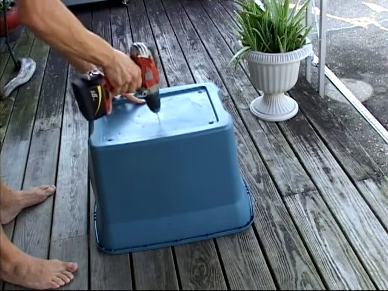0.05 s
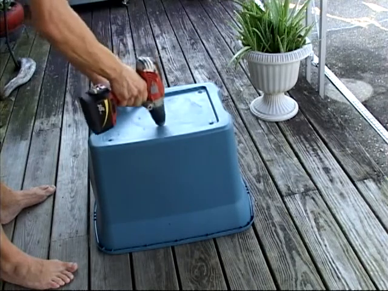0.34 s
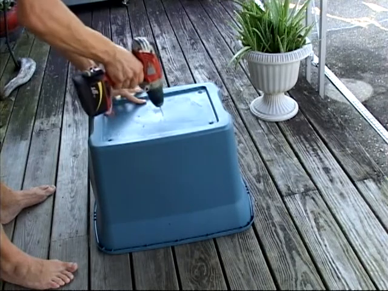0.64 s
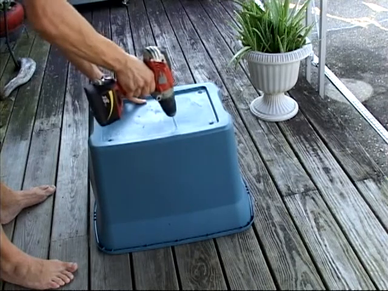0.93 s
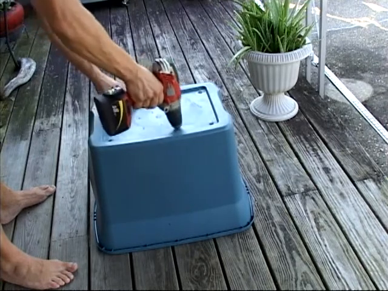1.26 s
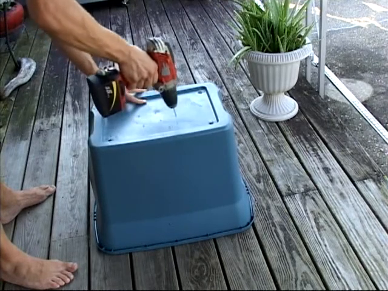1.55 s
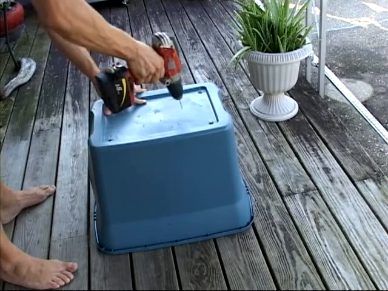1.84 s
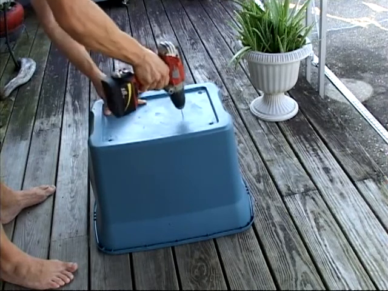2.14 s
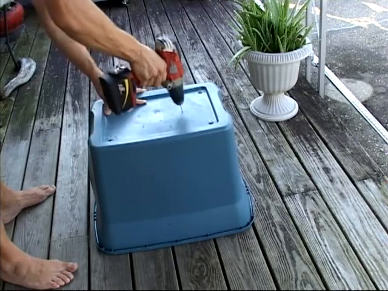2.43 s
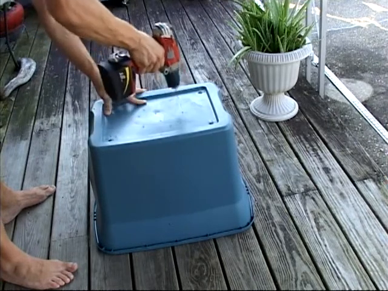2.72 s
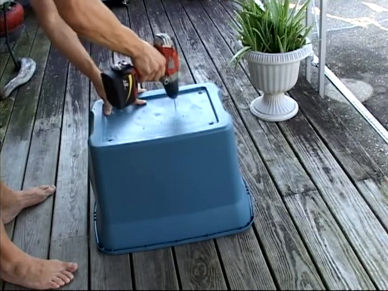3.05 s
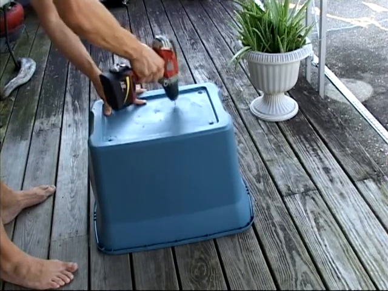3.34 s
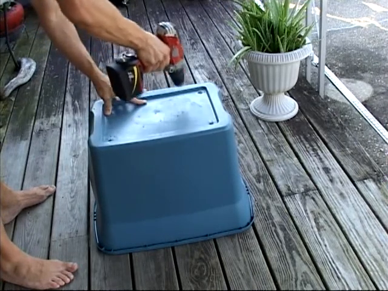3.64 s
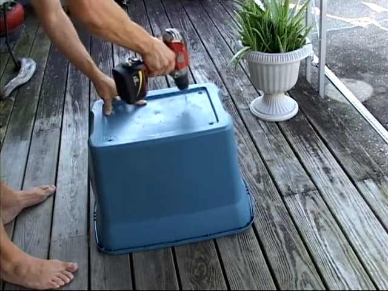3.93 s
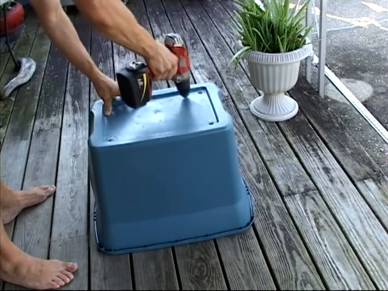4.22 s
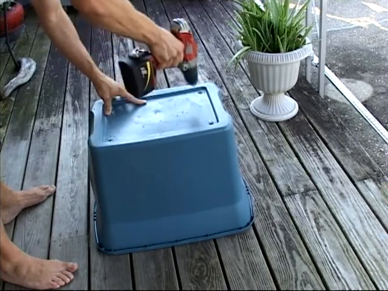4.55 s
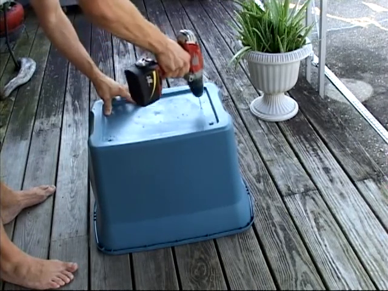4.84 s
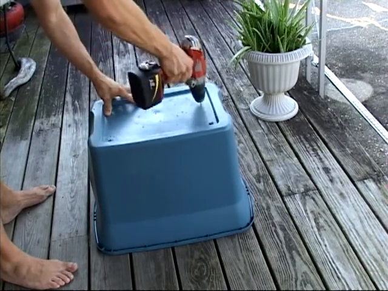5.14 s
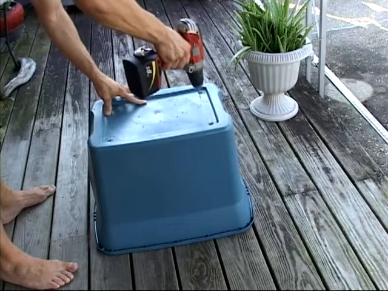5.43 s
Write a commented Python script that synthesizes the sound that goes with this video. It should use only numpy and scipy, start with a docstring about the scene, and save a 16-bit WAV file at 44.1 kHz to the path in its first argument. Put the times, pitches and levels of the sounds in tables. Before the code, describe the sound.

A cordless drill whines and rattles nonstop while boring six holes in a hollow plastic bin, with knocks and brief tearing snags.

```python
"""A cordless drill whines and rattles nonstop, boring six holes in an upturned plastic bin on a deck.
The whine is a set of multiples of the motor speed, which sags a little each time the bit bites.
Tooth impacts hiss in the gears and ring the housing. The bit knocks on the hollow bin, scrapes,
then snags and tears as it breaks through, shaking the wooden boards. Low outdoor air lies beneath."""
import sys
import numpy as np
from scipy import signal
from scipy.fft import rfft, irfft, next_fast_len
from scipy.io import wavfile
from scipy.ndimage import uniform_filter1d

SR = 44100
rng = np.random.default_rng(int(sys.argv[2]) if len(sys.argv) > 2 else 0)


def transcribe(signal):
    """Save signal, clipped to [-1, 1], as a 16-bit WAV file at the path in sys.argv[1]."""
    frames = np.atleast_2d(signal).T
    limited = np.clip(frames, -1, 1)
    pcm = np.round(limited * 32767).astype(np.int16)
    wavfile.write(sys.argv[1], SR, pcm)


N = 246078
TIME = np.arange(N) / SR
SIDES = np.array([[1], [-1]])  # left, right

# pushes on the drill: start/s, hardest/s, free again/s, speed lost/Hz
PUSHES = [(.29, .59, .86, 9.1), (1.23, 1.48, 1.79, 9.5), (2.19, 2.5, 2.8, 8.8), (3.11, 3.41, 3.74, 8.2),
          (4.06, 4.3, 4.62, 7.5), (5.02, 5.27, 5.58, 7.7)]
# holes: breakthrough/s, tear length/s, scrape/dB, tear/dB, deck shake re tear/dB, panel f/Hz, hum/dB
HOLES = [(.622, 0.094, -43, -37.5, -7, 155, -37), (1.573, 0.092, -42, -37.5, -6, 201, -38.5),
         (2.514, .13, -46, -41, -5, 199.5, -40.5), (3.462, 0.098, -44, -38, -3.5, 196, -35.5),
         (4.378, 0.092, -47, -41, -11, 160, -35), (5.301, 0.09, -43.5, -41, -6, 220.6, -31.5)]


def undb(db):
    """Decibels to gain."""
    return 10 ** (np.asarray(db) / 20)


def unit(x):
    """Scale to rms 1."""
    return x / np.sqrt(np.mean(x ** 2))


def curve(points):
    """(t/s, value) points to one value per sample."""
    return np.interp(TIME, *np.transpose(points))


def gate(start_s, end_s, rise_s, fade_s):
    """Linear rise, hold, exponential decay after the end."""
    return np.clip((TIME - start_s) / rise_s, 0, 1) * np.exp(-np.maximum(TIME - end_s, 0) / fade_s)


def walk(rate_hz):
    """Smooth random drift, rms 1."""
    hold = max(int(SR / rate_hz), 1)
    steps = np.repeat(rng.standard_normal(N // hold + 1), hold)[:N]
    return unit(uniform_filter1d(uniform_filter1d(steps, hold), hold))


def grains(rate_per_s, spread_db):
    """Random tiny impacts of uneven size, rms 1."""
    hit = rng.random(N) < rate_per_s / SR
    return unit(hit * rng.choice([-1, 1], N) * undb(spread_db * rng.standard_normal(N)))


def colour(x, points):
    """Filter by a spectrum of (f/Hz, level/dB) points."""
    size = next_fast_len(N + 8192)
    hz, db = np.transpose(points)
    grid_hz = np.maximum(np.fft.rfftfreq(size, 1 / SR), 1)
    gain = undb(np.interp(np.log(grid_hz), np.log(hz), db))
    return irfft(rfft(x, size) * gain, size)[:N]


def resonate(x, hz, width_hz):
    """One resonance, gain 1 at its centre."""
    return signal.lfilter(*signal.iirpeak(hz, hz / width_hz, fs=SR), x)


def spread(source):
    """Stereo from two draws of a source: one direct, one scattered from the sides."""
    # stereo width: f/Hz, side re mid/dB
    width = [(50, -10.5), (600, -19), (900, -15), (1350, -11.5), (1750, -4.5), (3300, -3), (4200, -6),
             (5900, -4), (7500, -8.5), (9700, -6.5), (11500, -11.5), (14000, -12)]
    return source() + SIDES * colour(source(), width)


def outdoors(air_db=-54):
    """Low, slowly swelling background."""
    # outdoor air spectrum: f/Hz, level/dB
    air = [(20, -10), (45, -10), (65, 1), (82, -15), (120, 3), (170, -9), (260, -18.5), (600, -8.5),
           (3000, -44)]
    return spread(lambda: unit(colour(rng.standard_normal(N), air))) * undb(air_db + 1.6 * walk(2.17))


def porch(x, t60_s=0.49, wet_db=-19, pan_db=-1.8, lag_s=0.000087):
    """The bin reaches one ear a moment later; deck and wall return a short, weak echo."""
    t = TIME[:SR // 2]
    echoes = rng.standard_normal((2, len(t))) * undb(-60 * t / t60_s)
    echoes /= np.sqrt(np.sum(echoes ** 2, axis=1, keepdims=True))
    direct = np.array([x, np.interp(TIME - lag_s, TIME, x)]) * undb(SIDES * pan_db / 2)
    return direct + undb(wet_db) * signal.fftconvolve(x[None], echoes, axes=1)[:, :N]


def early_echoes(x, count=12, echo_db=-8.5, wander_s=.00014):
    """Bin top, deck and wall reflect the drill; the delays drift as the hand moves."""
    share = undb(echo_db)
    echoes = 0
    for lag_s in rng.uniform(.003, .03, count):
        sent_s = TIME - lag_s - wander_s * walk(2)
        echoes = echoes + rng.choice([-1, 1]) * np.array([np.interp(sent_s, TIME, ear) for ear in x])
    return (x + share * echoes / np.sqrt(count)) / np.sqrt(1 + share ** 2)


def bin_ring(upper_db, split_hz=290):
    """The bin's response to one blow, peak 1; harder contact wakes more of the upper modes."""
    # bin modes: f/Hz, level/dB, t60/s
    modes = [(57.6, -11.5, 0.63), (91.5, -8, 0.78), (117.4, -14, 0.52), (151.4, 6.5, 0.28),
             (165.8, 3.5, 0.4), (199.4, 7, 0.27), (223.7, -2.5, 0.51), (264.8, -1, 0.3), (331, -21, 0.35),
             (357, -4, 0.27), (393, -11.5, 0.26), (446.3, 0.5, 0.12), (495.5, 0.5, 0.13), (572.4, -6, 0.24),
             (594, 2, 0.092), (690, -7.5, 0.13)]
    t = TIME[:SR // 2]
    ring = sum(undb(db + upper_db * (hz > split_hz) - 60 * t / t60_s) * np.sin(2 * np.pi * hz * t)
               for hz, db, t60_s in modes)
    return ring / np.abs(ring).max()


def strike_bin(blows, flex_s, ring_rise_s):
    """At each blow the soft panel swings for a few cycles and the whole bin rings on."""
    t = TIME[:SR // 2]
    swell = (t / flex_s * np.exp(1 - t / flex_s)) ** 2
    out = np.zeros(N + SR)
    for at_s, peak_db, spot_hz, ring_db, upper_db in blows:
        swing = swell * np.sin(2 * np.pi * spot_hz * t)
        ring = bin_ring(upper_db) * (1 - np.exp(-t / ring_rise_s))
        blow = swing + undb(ring_db) * ring / np.abs(ring).max()
        start = int(at_s * SR)
        out[start:start + len(t)] += undb(peak_db) * blow / np.abs(blow).max()
    return out[:N]


def knocks():
    """Bit and hand knock on the bin."""
    # knocks: t/s, peak/dB, struck spot f/Hz, ring re swing/dB, upper mode gain/dB
    blows = [(.157, -38, 163, 3, 7), (.237, -20.5, 142.5, -8, -2), (.388, -31, 146, -4, 4),
             (.615, -26, 188, -1, -5), (1.039, -38.5, 161, 15, 10), (1.222, -19, 141, 1.5, 1),
             (1.228, -25.5, 346.5, -11, 15), (1.245, -22.5, 131, -1, 12), (1.561, -25.5, 108, -1, 18),
             (2.102, -35, 137, 1, 9), (2.139, -37, 135, -8, -8), (2.165, -31.5, 138, -9, 5),
             (2.274, -32.5, 136, -2, 0), (3.064, -37.5, 275, 8, 7), (3.116, -31.5, 135, 5, -14),
             (3.221, -35.5, 155, -5, 7), (3.257, -38, 167, -9, -3), (3.962, -40.5, 154, 19, 5),
             (4.155, -36, 151, 12, -6), (4.861, -40, 226, 5, 9), (5.055, -32, 157, 5, -7),
             (5.103, -29.5, 132, 0, 8)]
    return strike_bin(blows, flex_s=0.01, ring_rise_s=0.0017)


def snags(gain_db=-2.0, ring_db=-9, upper_db=3):
    """The bit breaks through with one blow; its flutes then catch the rim in a quick, uneven run."""
    # catches on the rim: t/s, relative peak/dB, f/Hz
    catches = [(.629, -16.5, 157), (.657, -15.5, 183), (.684, -30, 230), (.711, -28.5, 212),
               (1.58, -17.5, 176), (1.606, -23.5, 193), (1.648, -24, 192), (2.514, -21, 180),
               (2.532, -23.5, 163), (2.552, -36, 290), (2.576, -21, 159), (2.604, -26, 152),
               (3.467, -17.5, 162), (3.483, -22, 207), (3.523, -23, 189), (3.56, -23, 187),
               (4.39, -27.5, 225), (4.415, -27, 155), (4.442, -25, 181), (4.461, -22, 170),
               (5.302, -24.5, 272), (5.324, -33, 235), (5.36, -26, 172), (5.383, -30, 170),
               (5.416, -35, 126)]
    blows = [(at_s, db + gain_db, hz, ring_db, upper_db) for at_s, db, hz in catches]
    return strike_bin(blows, flex_s=0.0076, ring_rise_s=0.0024)


def panel_hum(width_hz=16):
    """Tearing keeps the panel round each hole humming at its own pitch; it rings on briefly."""
    out = 0
    for through_s, length_s, *_, hz, hum_db in HOLES:
        chips = grains(1500, 2.7) * gate(through_s, through_s + length_s, 0.011, 0.0092)
        ring = resonate(resonate(chips, hz, width_hz), hz, 4 * width_hz)
        out = out + undb(hum_db) * ring * np.sqrt(length_s * SR / np.sum(ring ** 2))
    return out


def cutting(turns, gear_ratio=14, bite_delay_s=0.12, chatter=0.11, ring_db=-2, pressing_db=-12):
    """Two cutting edges shave the plastic, then tear through the last skin and shake the deck."""
    # spectrum of shaved and torn plastic: f/Hz, level/dB
    shaving = [(40, -42), (130, 0), (290, 1), (450, -3), (600, -0.5), (800, -1), (1500, -23), (3000, -27),
               (6000, -45), (12000, -75)]
    # spectrum of the deck boards: f/Hz, level/dB
    deck = [(15, -25), (32, -10), (60, 0), (80, 0), (100, -8), (220, -30), (1500, -90)]
    scrape, tear, shake = 0, 0, 0
    for (push_s, *_), (through_s, length_s, scrape_db, tear_db, deck_db, *_) in zip(PUSHES, HOLES):
        scrape = scrape + undb(scrape_db) * gate(push_s + bite_delay_s, through_s, 0.088, 0.024)
        tearing = undb(tear_db) * gate(through_s, through_s + length_s, 0.0054, 0.034)
        tear = tear + tearing
        shake = shake + undb(deck_db) * tearing
    edges = 1 + chatter * np.cos(2 * np.pi * 2 * turns / gear_ratio)

    def plastic(upper_db):
        """Chips snap off in waves as each edge passes; each rings the bin."""
        chips = grains(1500, 4.4) * edges
        ring = signal.fftconvolve(chips, bin_ring(upper_db))[:N]
        return unit(unit(colour(chips, shaving)) + undb(ring_db) * unit(ring))

    rumble = (undb(pressing_db) * scrape + shake) * unit(colour(grains(900, 0.9), deck))
    return scrape * plastic(upper_db=11) + tear * plastic(upper_db=4) + rumble


def gearbox(turns, load, throb=0.071, treble_hz=7000, pan_db=.5, fade_db_per_s=0.1432):
    """Dense tooth impacts, harder under load, hiss in the gears and ring the housing."""
    # gear rattle spectrum: f/Hz, level/dB
    spectrum = [(200, -30), (290, -19), (380, -19), (600, -14), (850, -5.5), (1500, -5), (1900, -3),
                (2300, -3.5), (3500, -2), (4200, 1), (5400, -0.2), (6300, -5), (7500, -7.5), (8400, -8),
                (9800, -15.5), (13800, -23), (15500, -62)]
    # housing resonances: f/Hz, width/Hz, level/dB
    modes = [(810, 20, -12.5), (923, 15, 3.5), (999, 57, -2.5), (1105, 25, -1.5), (1208, 50, 3),
             (1277, 48, -7), (1806, 25, 0), (1917, 9.7, -5.5), (3100, 30, -3.5), (3960, 76, -7.5),
             (4216, 91, -5), (6730, 150, -8)]
    flicker_db = 0.5 * walk(70) + 0.34 * walk(9)
    clatter = (1 + throb * np.cos(2 * np.pi * turns)) * undb(flicker_db)
    rattle = spread(lambda: unit(colour(grains(25000, 1.3) * clatter, spectrum)))
    body = signal.sosfiltfilt(signal.butter(2, treble_hz, fs=SR, output="sos"), rattle)
    treble_db = -0.8 - 0.45 * TIME + 0.5 * load  # dulls slowly, brightens under load
    rattle = body + (rattle - body) * undb(treble_db)

    def housing():
        """The shell rings under tooth impacts."""
        teeth = grains(8000, 2.1) * clatter
        return unit(sum(undb(db) * resonate(teeth, hz, width_hz) for hz, width_hz, db in modes))

    ring = spread(housing) * undb(-3 + load - 0.08 * TIME)
    gears = rattle * undb(3.5 + SIDES * pan_db / 2) + ring
    return gears * undb(-35.5 - fade_db_per_s * TIME + 0.5 * load)


def echo_paths(rate_hz):
    """Complex gain of a tone's many echoes at each ear, shifting as the drill moves."""
    return np.array([walk(rate_hz) + 1j * walk(rate_hz) for _ in range(2)]) / np.sqrt(2)


def cancellations():
    """Complex gain of the main tone cancelling against its echo: it dips and returns inverted."""
    # dropouts: t/s, half length/s, depth/dB
    dropouts = [(.45, .012, -8), (.532, .008, -20), (.605, .02, -16), (.688, .015, -22), (.757, .018, -13),
                (1.02, .03, -18), (1.36, .015, -9), (1.53, .02, -8), (1.595, .02, -22), (1.692, .025, -20),
                (2.27, .02, -15), (2.388, .025, -14), (3.018, .025, -20), (3.17, .01, -11),
                (3.225, .01, -17), (3.685, .01, -15), (3.753, .018, -20), (3.985, .012, -18),
                (4.205, .01, -9), (4.535, .012, -8), (4.72, .025, -11), (5.085, .025, -11),
                (5.24, .015, -18), (5.365, .025, -11)]
    gain = np.ones(N, complex)
    for at_s, half_s, depth_db in dropouts:
        crossing = np.sin(np.pi / 2 * np.clip((TIME - at_s) / (2 * half_s), -1, 1))
        residue = rng.choice([-1, 1]) * undb(depth_db) * (1 - crossing ** 2)
        gain = gain * (crossing + 1j * residue)
    return gain


def whine(turns, load, jitter_rad=.15, flutter_db=.9, ear_phase_rad=0.94, sway_db=0.5, echo_load_db=2):
    """Motor harmonics: the 15th and 16th beam as the drill moves and beat with echoes; the rest flicker."""
    # main tone, 15th: t/s, level/dB
    main_levels = [(0, -33.5), (.09, -36.5), (.2, -30), (.31, -25.5), (.37, -39), (.42, -38), (.48, -30.5),
                   (.56, -33), (.65, -32), (.73, -34), (.81, -31), (.89, -31.5), (.97, -42), (1.16, -43),
                   (1.2, -35), (1.28, -29), (1.47, -29), (1.63, -30.5), (1.78, -36), (1.86, -31),
                   (1.96, -29), (2.1, -32), (2.14, -39), (2.29, -40), (2.32, -31), (2.42, -33), (2.48, -27),
                   (2.52, -28.5), (2.55, -39), (2.62, -33.5), (2.73, -39), (2.78, -35), (2.83, -38),
                   (2.87, -31.5), (2.98, -35), (3.06, -30), (3.13, -29), (3.28, -36), (3.34, -30),
                   (3.38, -35), (3.43, -31), (3.48, -38), (3.55, -38), (3.6, -27), (3.67, -37), (3.95, -37),
                   (4.03, -39), (4.11, -48), (4.18, -27), (4.24, -35), (4.29, -33.5), (4.35, -43),
                   (4.41, -30.5), (4.5, -31.5), (4.65, -39), (4.78, -34), (4.86, -33), (4.94, -29),
                   (5.15, -30), (5.2, -38), (5.26, -36), (5.3, -27.5), (5.43, -28), (5.48, -39),
                   (5.57, -36)]
    # side it beams to: t/s, left re right/dB
    main_pan = [(0, 6), (.3, 2.5), (.42, -3), (.5, 2), (.76, -8), (.88, 7), (1.3, -1), (1.52, 2),
                (1.72, -4), (2.1, 9.5), (2.26, 1), (2.55, 1), (2.68, -3), (3.0, 3), (3.18, -8), (3.39, 6),
                (3.65, -5), (3.95, 2), (4.35, -6), (4.55, 6), (4.8, -10), (4.93, 6), (5.2, 0), (5.57, 3)]
    # upper tone, 16th, with its own beam: t/s, relative level/dB
    upper_levels = [(0, -45), (.1, -52), (.16, -43), (.29, -37), (.42, -41), (.6, -42), (.82, -41),
                    (.93, -48), (1.05, -42), (1.29, -39), (1.53, -44), (1.8, -41), (1.93, -41), (1.99, -51),
                    (2.2, -46), (2.36, -39.5), (2.51, -38), (2.55, -48), (2.6, -40.5), (2.89, -47),
                    (2.96, -41), (3.06, -38), (3.27, -44), (3.42, -42), (3.48, -50), (3.53, -40),
                    (3.6, -47), (3.66, -40), (3.88, -38), (4.08, -53), (4.16, -42), (4.44, -44),
                    (4.54, -40), (4.7, -41), (4.83, -35.5), (4.88, -38), (4.92, -52), (4.97, -39),
                    (5.05, -39.5), (5.18, -48), (5.35, -46), (5.43, -41), (5.57, -42)]
    # weak tones: multiple of motor speed, level/dB
    overtones = [(10, -60), (14, -48), (20, -63), (24, -55.5), (30, -58)]

    def tone(multiple, level_db, pan_db, echo_db):
        """One tone at both ears; gear meshing roughens its phase and level."""
        share = undb(echo_db + echo_load_db * load)
        phase = 2 * np.pi * multiple * turns + jitter_rad * walk(90)
        phase = phase + SIDES * ear_phase_rad * walk(6.34) / 2
        beating = (1 + share * echo_paths(48)) / np.sqrt(1 + share ** 2)
        ear_db = level_db + flutter_db * walk(80) + SIDES * (pan_db + sway_db * walk(22)) / 2
        return np.exp(1j * phase) * beating * undb(ear_db)

    tones = tone(15, curve(main_levels), curve(main_pan), echo_db=-15) * cancellations()
    tones += tone(16, curve(upper_levels) + 0.1, pan_db=1, echo_db=-7)
    for multiple, db in overtones:
        tones += np.exp(2j * np.pi * multiple * turns) * echo_paths(40) * undb(db)
    return np.sqrt(2) * tones.imag


def motor(idle_hz=348.55, tire_hz_per_s=.17, waver_hz=.2, load_waver_hz=.3):
    """Turns made and load (0-1): the motor drags as the bit bites and spins up as it comes through."""
    lost_hz = 0
    for push_s, hardest_s, free_s, slows_hz in PUSHES:
        biting = np.sin(np.pi / 2 * np.clip((TIME - push_s) / (hardest_s - push_s), 0, 1))
        easing = np.cos(np.pi / 2 * np.clip((TIME - hardest_s) / (free_s - hardest_s), 0, 1)) ** 2
        lost_hz = lost_hz + slows_hz * biting * easing
    load = lost_hz / lost_hz.max()
    drift_hz = waver_hz * walk(11) + load_waver_hz * load * walk(22)
    speed_hz = idle_hz - tire_hz_per_s * TIME - lost_hz + drift_hz
    return np.cumsum(speed_hz) / SR, load


def scene():
    """Air, bin and drill; one motor paces gears, whine and cutting edges."""
    turns, load = motor()
    drill = early_echoes(gearbox(turns, load)) + whine(turns, load)
    plastic_bin = porch(knocks() + snags() + panel_hum() + cutting(turns))
    return outdoors() + plastic_bin + drill


def record(dry, top_hz=15000):
    """Steep low-pass."""
    return signal.sosfilt(signal.ellip(8, .2, 70, top_hz, fs=SR, output="sos"), dry)


dry = scene()
out = record(dry)
transcribe(out)
```